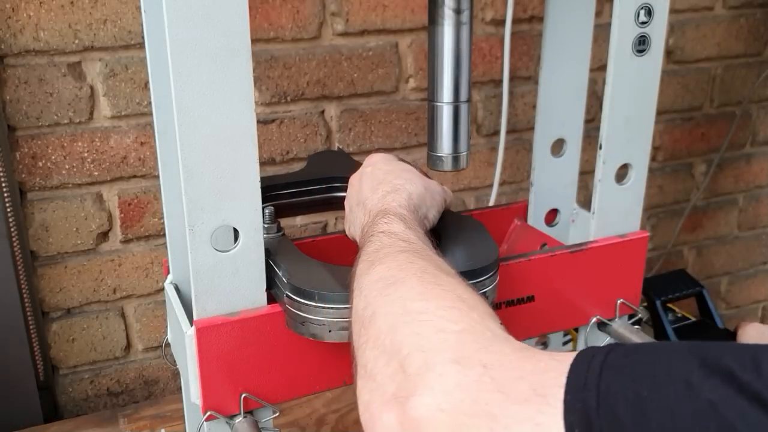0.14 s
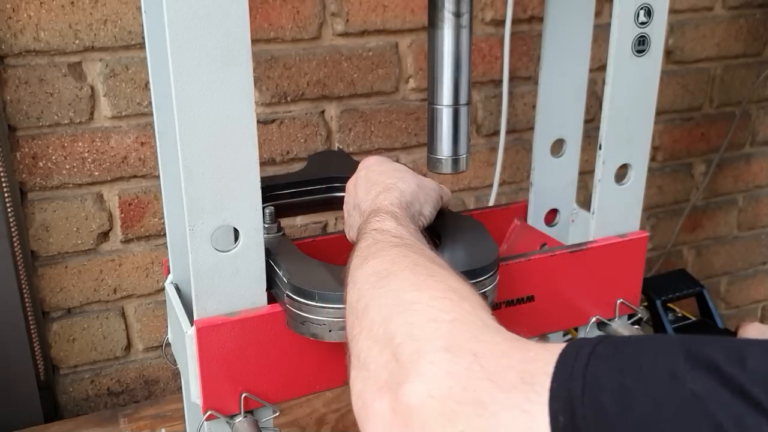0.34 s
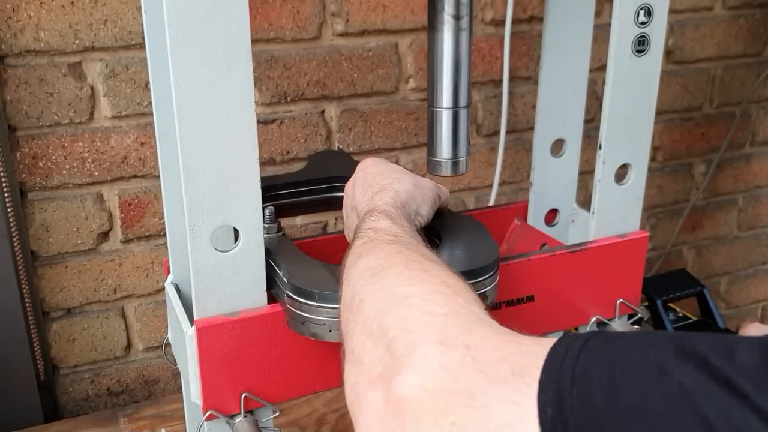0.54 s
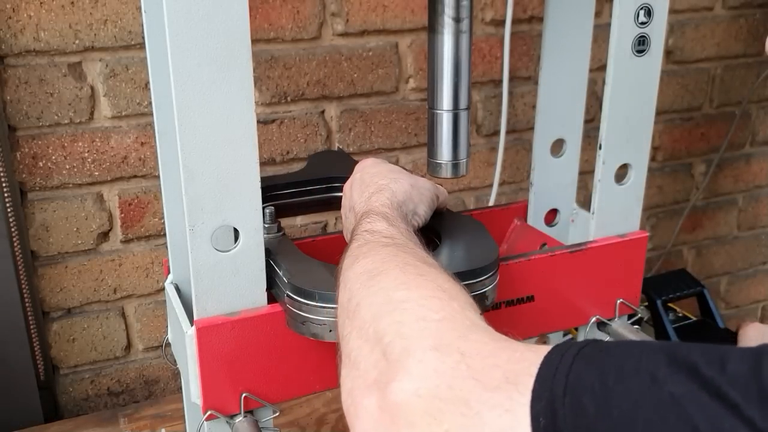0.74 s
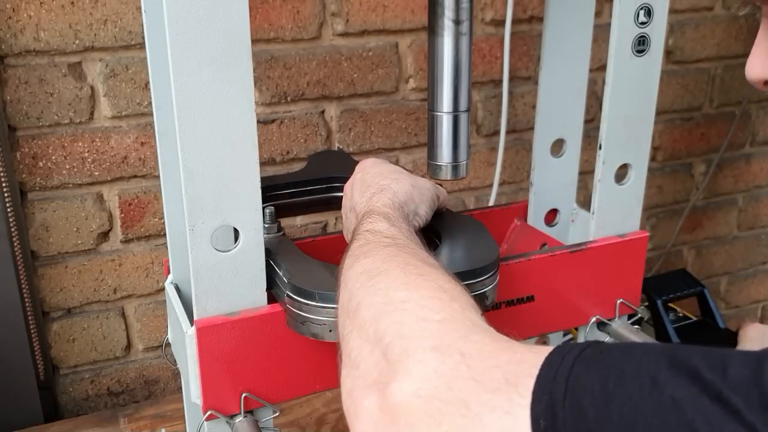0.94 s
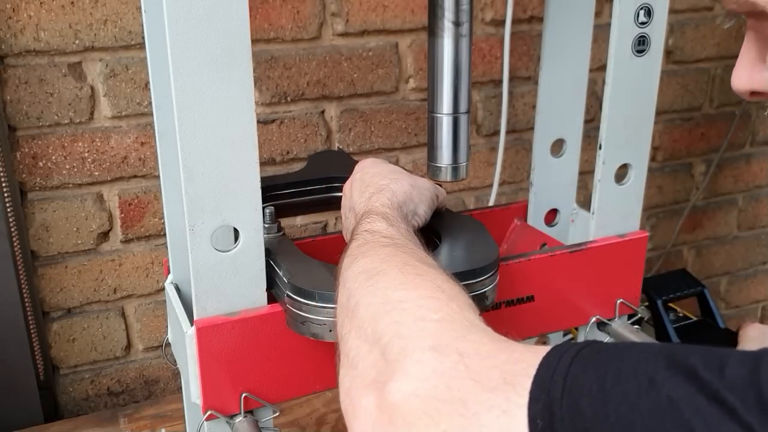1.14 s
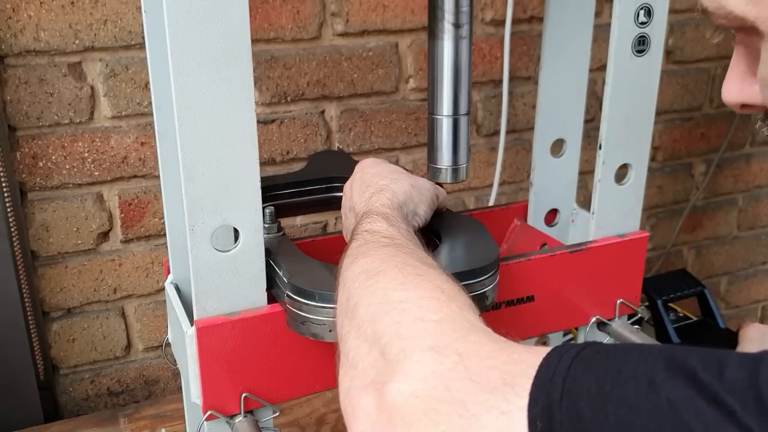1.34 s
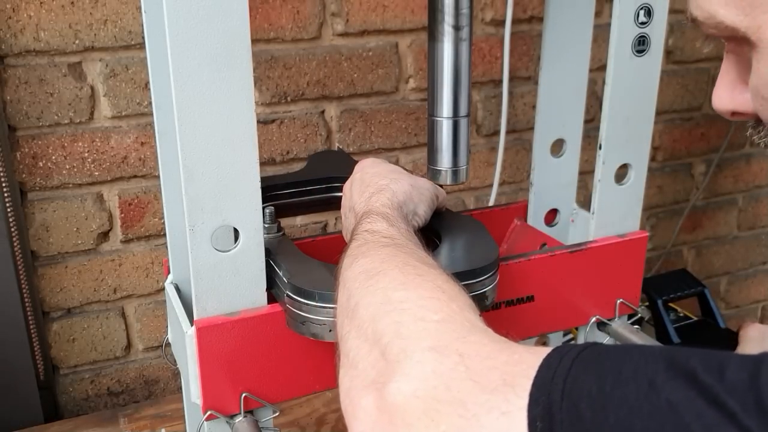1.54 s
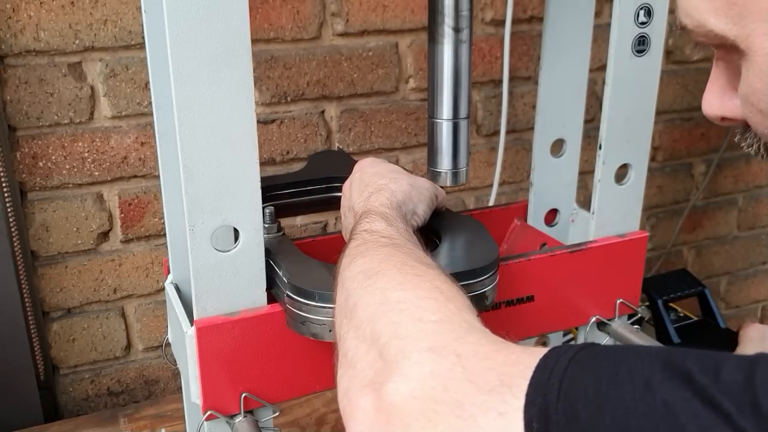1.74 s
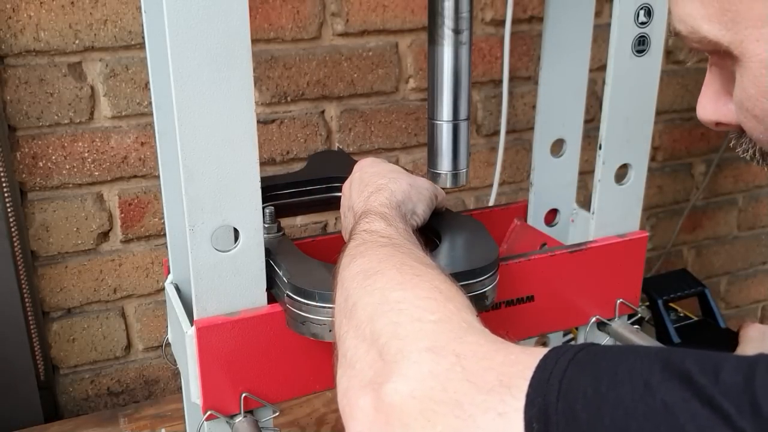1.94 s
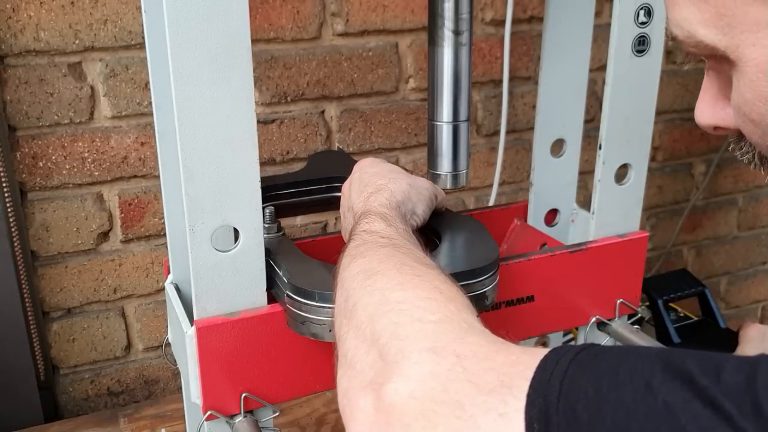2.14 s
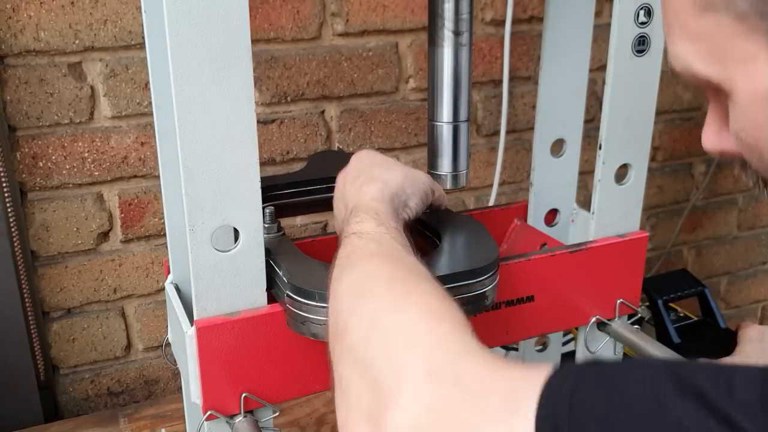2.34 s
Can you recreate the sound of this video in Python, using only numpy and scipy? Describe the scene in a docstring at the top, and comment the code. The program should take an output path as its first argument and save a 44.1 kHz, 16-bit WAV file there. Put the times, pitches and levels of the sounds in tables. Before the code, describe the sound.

An air-driven hydraulic pump rattles in fast, hard metallic knocks, then stops in a brick workshop

```python
"""A brick workshop, where an air-driven hydraulic pump runs a press ram down, over a faint shop murmur (noise).
Each stroke puffs exhaust air (noise burst), then the piston lands: the housing thuds, the steel frame rings
(decaying sines) and loose parts rattle (noise burst); the returning piston knocks the rear cap.
Strokes slow as the load grows, quickening for a while midway; the room carries the last one away
over a tick and a soft bump. Two spaced microphones, source to the right."""
import sys
import numpy as np
from scipy import signal
from scipy.fft import rfft, irfft, next_fast_len
from scipy.io import wavfile

SR = 44100
rng = np.random.default_rng(int(sys.argv[2]) if len(sys.argv) > 2 else 0)


def amplitude_ratio(level_db):
    """Convert a level in decibels to the matching linear amplitude (field) ratio."""
    exponent = np.asarray(level_db, float) / 20
    return 10 ** exponent


def waveform_to_disk(signal):
    """Save audio, clipped to [-1, 1], as 16-bit WAV at the path in sys.argv[1]."""
    frames = np.transpose(np.atleast_2d(signal))
    scaled = np.clip(frames, -1, 1) * 32767
    samples = np.round(scaled).astype(np.int16)
    wavfile.write(sys.argv[1], SR, samples)


N = 110250


def unit(x):
    """Scale to rms 1."""
    return x / np.sqrt(np.mean(x ** 2) + 1e-20)


def along(points, hz):
    """Read a curve of (Hz, value) points on a log frequency axis."""
    f, v = np.transpose(points)
    return np.interp(np.log(hz + 1), np.log(f + 1), v)


def filtered(x, response):
    """Multiply the spectrum of x by a complex response of frequency."""
    m = next_fast_len(N + SR)
    return irfft(rfft(x, m) * response(np.fft.rfftfreq(m, 1 / SR)), m)[..., :N]


def noise(spectrum):
    """Coloured noise of rms 1."""
    return unit(filtered(rng.standard_normal(N), lambda hz: amplitude_ratio(along(spectrum, hz))))


SPREAD = .55  # share of the noise power that differs between the microphones


def wide(spectrum):
    """Noise from a source of some size: partly the same, partly different at the two microphones."""
    shared = noise(spectrum)
    separate = np.array([noise(spectrum), noise(spectrum)])
    return np.sqrt(1 - SPREAD) * shared + np.sqrt(SPREAD) * separate


def bursts(times, levels_db, rise_s, t60_s):
    """Envelope of bursts that rise and die, summed in power."""
    t = np.maximum(np.arange(N) / SR - np.asarray(times)[:, None], 0)
    each = amplitude_ratio(np.asarray(levels_db)[:, None] - 60 * t / t60_s) * (1 - np.exp(-t / rise_s))
    return np.sqrt(np.sum(each ** 2, axis=0))


def decaying_sine(t, hz, db, t60):
    """A struck mode: a sine that falls 60 dB in t60 seconds."""
    return amplitude_ratio(db - 60 * t / t60) * np.sin(2 * np.pi * hz * t)


def struck(ring, levels_db, times):
    """Place half a second of ring(t, stroke number) at every blow."""
    out, t = np.zeros(N + SR), np.arange(SR // 2) / SR
    for k, (start_s, db) in enumerate(zip(times, levels_db)):
        out[round(start_s * SR):][:len(t)] += amplitude_ratio(db) * ring(t, k)
    return out[:N]


# How alike left and right are in diffuse sound. Each row: frequency in Hz, left-right correlation (0 to 1).
ALIKENESS = [(60, 0.79), (300, 0.93), (640, 0.51), (1400, 0.025)]


def paired(pair):
    """Blend two unrelated signals into left and right that agree in the bass and hardly in the treble."""
    def mid_side_gains(hz):
        turn = np.arccos(np.clip(along(ALIKENESS, hz), -1, 1)) / 2
        return np.array([np.cos(turn), np.sin(turn)])

    mid, side = filtered(pair, mid_side_gains)
    return np.array([mid + side, mid - side])


# Loudness of the shop murmur over time. Each row: time in seconds, level in dB.
MURMUR_LEVEL = [(0, -56.5), (.09, -48.5), (0.192, -40.5), (.3, -24), (2.298, -34), (2.5, -72)]
# Colour of the murmur. Each row: frequency in Hz, relative level in dB per Hz.
MURMUR_COLOUR = [(15, -40), (25, -12), (55, 5.5), (373, -7), (988, -13.5), (1070, -15), (1940, -8),
                 (3160, -14.5), (4140, -16), (11000, -33), (16000, -51)]


def murmur():
    """Faint wide shop noise that swells around the first stroke, slowly sinks and fades at the end."""
    level_db = np.interp(np.arange(N) / SR, *np.transpose(MURMUR_LEVEL))
    return amplitude_ratio(level_db) * paired(np.array([noise(MURMUR_COLOUR), noise(MURMUR_COLOUR)]))


# Decay of the brick room. Each row: frequency in Hz, t60 in seconds.
ROOM_DECAY = [(60, 0.18), (300, 0.49), (2000, 0.32), (6000, 0.36), (11000, 0.23), (15000, 0.11)]
# Strength of the room against what feeds it. Each row: frequency in Hz, level in dB.
ROOM_LEVEL = [(60, -16), (120, -2.5), (300, -11), (700, -4.5), (2000, 7), (6000, 2.5), (15000, 12.5)]
NEAR_WALL_DB, NEAR_WALL_T60_S = -37, 0.034  # dense early echoes over the start of the tail
PIECE = 4096  # samples that share one room tail


def room(x):
    """Each frequency of the brick room dies at its own speed; the tail's detail keeps changing."""
    out = np.zeros((2, N + SR + PIECE))
    x = np.pad(x, (60, PIECE))  # the room answers 60 samples late
    window = np.sin(np.pi * np.arange(PIECE) / PIECE)
    for start in range(0, N, PIECE // 2):
        hz, t, grain = signal.stft(rng.standard_normal((2, SR // 2)), SR, nperseg=256)
        late = amplitude_ratio(-60 * t / along(ROOM_DECAY, hz)[:, None])
        fade = late + amplitude_ratio(NEAR_WALL_DB - 60 * t / NEAR_WALL_T60_S)
        # equal energy in every band, then the room's own colour
        fade = fade / np.sqrt(np.sum(fade ** 2, axis=1, keepdims=True) * 128)
        fade = fade * amplitude_ratio(along(ROOM_LEVEL, hz))[:, None]
        tail = signal.istft(grain * fade, SR, nperseg=256)[1]
        wet = signal.fftconvolve((x[start:][:PIECE] * window)[None], tail, axes=1)
        out[:, start:start + wet.shape[1]] += wet
    return paired(out[:, :N])


# A hand nudges the work on the bed. Each row: start in seconds, level in dB.
BUMPS = [(2.43, -32)]
# Modes of the press bed. Each row: frequency in Hz, relative level in dB, t60 in seconds.
BED = [(60, -2, 0.16), (94, -6, 0.092), (174, -15.5, 0.073)]


def bumps():
    """A soft low knock after the pump stops: a few bed modes with a rounded attack."""
    starts, levels_db = np.transpose(BUMPS)
    t = np.maximum(np.arange(N) / SR - starts[:, None], 0)
    ring = sum(decaying_sine(t, *mode) for mode in BED)
    return amplitude_ratio(levels_db) @ (ring * (1 - np.exp(-t / 0.0067)))


# Piston landings. Each entry: time in seconds.
LANDINGS = np.array([.227, .2709, .3056, .342, .3783, .4155, .4534, .4915, .530, .5687, .6078, .6481, .6924, .7381, .7845, .8305, .8792, .9286, .9795, 1.0337, 1.0929, 1.1573, 1.2238, 1.2846, 1.3377, 1.3888, 1.4387, 1.4874, 1.5373, 1.5886, 1.6422, 1.7015, 1.7607, 1.8191, 1.8777, 1.9392, 2.0066, 2.0796, 2.1649])
# Stroke strength as the air supply settles and the load grows. Each row: time in seconds, then
# relative levels in dB of thud, clank, exhaust puff, ping, backstroke.
EFFORT = [(.227, -1.5, -5, -22, -14, -11), (.27, -7.5, -6, -17.5, -14, -11),
          (.31, -8, -16, -16.5, -14, -12), (.38, -10, -13.5, -20, -16, -18),
          (.53, -11, -14.5, -22.5, -18, -26), (.65, -12.5, -12, -25.5, -18, -28),
          (.8, -8, -11, -25.5, -14, -28), (1.0, -8, -12, -27, -14, -26), (1.16, -7.5, -10, -30, -14, -26),
          (1.23, -6.5, -9.5, -28, -14, -26), (1.3, -8, -10.5, -27.5, -16, -26),
          (1.45, -8, -11, -26, -16, -26), (1.62, -7, -10.5, -28, -16, -26), (1.72, -7, -12, -28, -16, -26),
          (1.93, -8, -10.5, -29, -16, -26), (2.01, -6.5, -9, -28, -14, -26),
          (2.08, -8, -8.5, -28.5, -9, -26), (2.165, -6.5, -8, -27.5, -2, -21)]


def strength(column):
    """One column of the effort curve at every landing, dB."""
    curve = np.transpose(EFFORT)
    return np.interp(LANDINGS, curve[0], curve[column])


# Colour of loose parts shaking. Each row: frequency in Hz, relative level in dB per Hz.
RATTLE_COLOUR = [(300, -72), (500, -14), (750, -7.5), (1100, -7), (1650, -12), (1950, -2), (2200, -9.5),
                 (3000, -8.5), (4200, -21.5), (5800, -16.5), (8000, -31), (16000, -77)]
RATTLE_UNDER_CLANK_DB, RATTLE_T60_S = -10, 0.071


def rattle():
    """Loose parts shaken by each landing: a short burst of noise under the clank."""
    levels_db = strength(column=2) + RATTLE_UNDER_CLANK_DB
    return wide(RATTLE_COLOUR) * bursts(LANDINGS, levels_db, rise_s=0.001, t60_s=RATTLE_T60_S)


# A loose part settles. The one row: start in seconds, level in dB, t60 in seconds.
TICK = (2.412, -43, .015)


def tick():
    """One faint dry tick in the tail: a very short burst of rattle-coloured noise."""
    start_s, db, t60 = TICK
    return wide(RATTLE_COLOUR) * bursts([start_s], [db], rise_s=.0004, t60_s=t60)


# Modes of the cylinder's rear cap. Each row: frequency in Hz, relative level in dB, t60 in seconds.
CAP = [(270.5, 1.5, 0.095), (444, 0.5, 0.045), (568, -1, 0.048), (1008, -4, 0.054)]
CAP_SCATTER_DB = 2
BACK_SHARE, LAST_BACK_S = .48, 2.243  # the piston returns about halfway between landings


def backstroke():
    """The returning piston knocks the rear cap of the cylinder, which rings in a few short modes."""
    times = np.append(LANDINGS[:-1] + BACK_SHARE * np.diff(LANDINGS), LAST_BACK_S)
    hz, db, t60 = np.transpose(CAP)[..., None]
    luck_db = CAP_SCATTER_DB * rng.standard_normal((len(times), len(CAP), 1))

    def ring(t, k):
        modes = decaying_sine(t, hz, db + luck_db[k], t60)
        return np.sum(modes, axis=0) * (1 - np.exp(-t / 0.0012))

    return struck(ring, strength(column=5), times)


STEEL_SCATTER_DB, DETUNE = 1.5, .002  # spread per blow: level, and pitch as a fraction


def steel(modes, levels_db):
    """Steel modes, excited at each landing with slightly different level and pitch and any phase."""
    hz, db, t60 = np.transpose(modes)[..., None]
    luck = rng.standard_normal((len(LANDINGS), 3, len(modes), 1))

    def ring(t, k):
        loudness, pitch, phase = luck[k]
        decay = amplitude_ratio(db + STEEL_SCATTER_DB * loudness - 60 * t / t60)
        attack = 1 - np.exp(-t / 0.00057)
        tone = np.sin(2 * np.pi * (hz * (1 + DETUNE * pitch) * t + phase))
        return np.sum(decay * attack * tone, axis=0)

    return struck(ring, levels_db, LANDINGS)


# Modes of the steel frame. Each row: frequency in Hz, relative level in dB, t60 in seconds.
FRAME = [(597, -48.5, 1), (991, -31, 0.49), (1086, -39.5, 0.22), (1145, -19.5, 0.16), (1337, -18.5, 0.11),
         (1890, -23, .08), (1976, -14, .3), (2050, -26, .1), (2195, -39, 0.75), (2535, -23, 0.17),
         (2860, -40, 0.22), (2900, -44, 0.067)]


def clank():
    """The steel frame rings in its own modes after each landing."""
    return steel(FRAME, strength(column=2))


# Modes of the piston's steel stop. Each row: frequency in Hz, relative level in dB, t60 in seconds.
PING = [(2400, -14, .015), (4700, -17, .012), (5066, -30, .35), (5416, -28, .3), (5700, -27, .15),
        (5900, -16, .08), (5965, -34, .42), (6090, -33, .3), (5820, -34, .3), (12200, -41, .5)]


def ping():
    """The piston's steel stop rings high, heard when the piston lands hard."""
    return steel(PING, strength(column=4))


# Colour of the exhaust air. Each row: frequency in Hz, relative level in dB per Hz.
AIR_COLOUR = [(240, -33), (400, 1.5), (563, -12.5), (745, -14.5), (1000, -9.5), (1430, -13), (1720, -24.5),
              (1950, -16), (2150, -14), (3000, -14.5), (15000, -24), (15700, -26), (16500, -126)]
VALVE_LEAD_S, PUFF_RISE_S, PUFF_T60_S = 0.017, 0.0032, 0.17  # the valve opens ahead of the landing
PUFF_GAIN_DB = 2.5  # on top of the effort curve


def exhaust():
    """A puff of turbulent air, a noise burst, each time the valve opens."""
    levels_db = strength(column=3) + PUFF_GAIN_DB
    return wide(AIR_COLOUR) * bursts(LANDINGS - VALVE_LEAD_S, levels_db, PUFF_RISE_S, PUFF_T60_S)


# Modes of housing and bench. Each row: frequency in Hz, relative level in dB, t60 in seconds, polarity.
HOUSING = [(44, -29, .3, 1), (57, -31, .35, 1), (82, -13, .36, -1), (123, -24, .3, -1), (160, -17, .13, -1),
           (188, -26, .3, 1), (241, -8.5, .075, 1), (272, -20, .25, -1), (291, -6.5, .12, 1),
           (334, -5.5, .065, -1), (386, -19, .15, 1), (480, -22, .2, 1), (555, -26, .2, -1)]
# The piston touches just before the full blow. The one row: frequency in Hz, relative level in dB, t60 in seconds.
FIRST_CONTACT = (400, -9, .025)
HOUSING_SCATTER_DB, HOUSING_LATE_S = 1.3, .0026


def thud():
    """A light first contact, then the housing rings in low modes, much the same way at each landing."""
    hz, db, t60, polarity = np.transpose(HOUSING)[..., None]
    luck_db = HOUSING_SCATTER_DB * rng.standard_normal((len(LANDINGS), len(HOUSING), 1))

    def ring(t, k):
        since_blow = np.maximum(t - HOUSING_LATE_S, 0)
        modes = polarity * decaying_sine(since_blow, hz, db + luck_db[k], t60)
        return np.sum(modes, axis=0) - decaying_sine(t, *FIRST_CONTACT)

    return struck(ring, strength(column=1), LANDINGS)


# Balance of the pump and its room. Each row: frequency in Hz, left over right in dB.
LEFT_OVER_RIGHT = [(60, -3.5), (110, 3.5), (200, -1.5), (380, 0), (700, -2), (1290, -1.5), (2380, -1.5),
                   (4400, -2), (8120, -1.5), (15000, -3.5)]
LEFT_LAG_S = 0.00021
FRAME_TO_ROOM_DB = -13  # the steel rings feed the room less than the rest


def scene():
    """The pump reaches the right microphone first; its room and the shop murmur surround it."""
    rings = clank() + ping()
    air = rattle() + exhaust() + tick()
    low = thud() + backstroke() + bumps()

    def lag(hz):  # half the lag late on the left, half early on the right
        return np.exp(-1j * np.pi * hz * LEFT_LAG_S * np.array([[1], [-1]]))

    def balance(hz):
        return amplitude_ratio(along(LEFT_OVER_RIGHT, hz) * np.array([[.5], [-.5]]))

    direct = filtered(rings + air + low, lag)
    # the right-hand air noise feeds the room
    echo = room(amplitude_ratio(FRAME_TO_ROOM_DB) * rings + air[1] + low)
    return filtered(direct + echo, balance) + murmur()


def low_pass(x):
    """Removes everything above the highest recorded frequency."""
    return signal.sosfilt(signal.butter(12, 16170, fs=SR, output="sos"), x)


LOW_CUT_HZ = 3.9  # corner of each of two first-order low cuts


def record(dry):
    """The microphones lose the deepest bass."""
    heard = filtered(dry, lambda hz: (1j * hz / (LOW_CUT_HZ + 1j * hz)) ** 2)
    return low_pass(heard)


dry = scene()
out = record(dry)
waveform_to_disk(out)
```